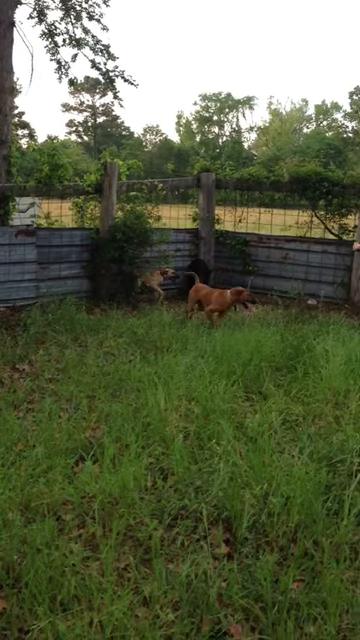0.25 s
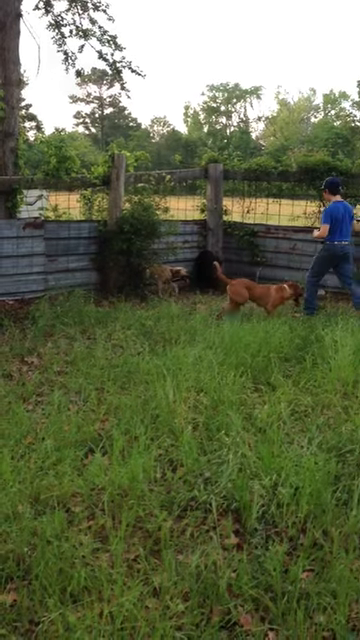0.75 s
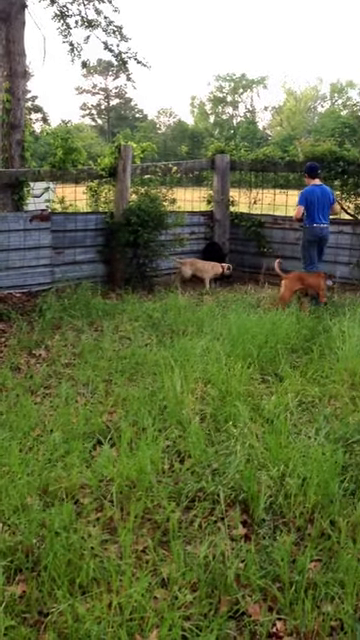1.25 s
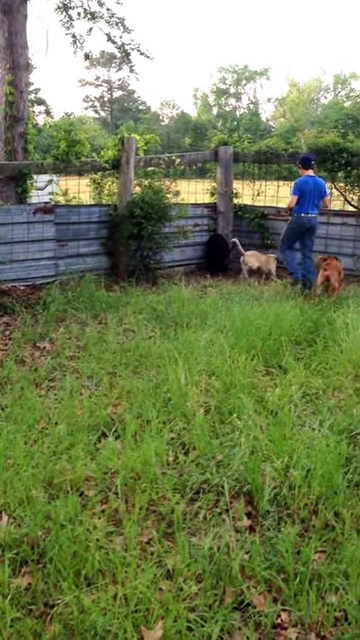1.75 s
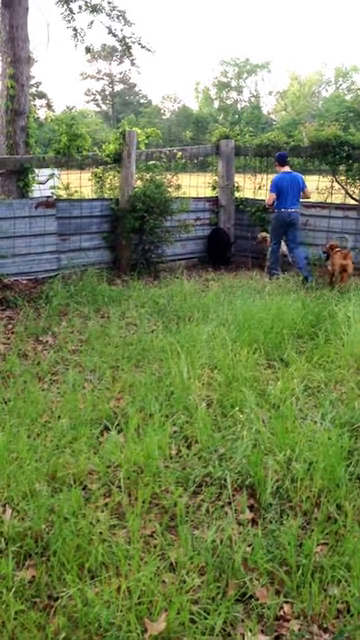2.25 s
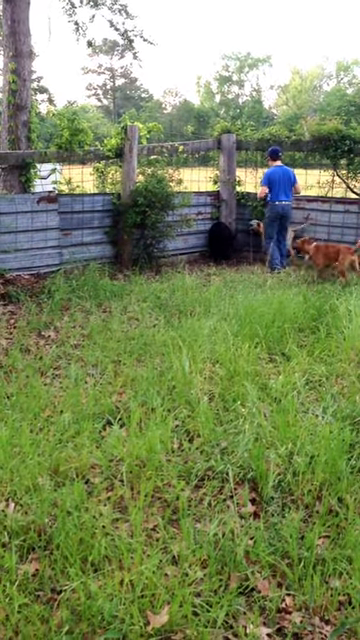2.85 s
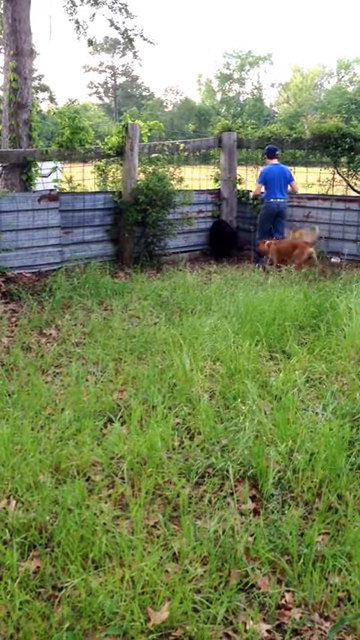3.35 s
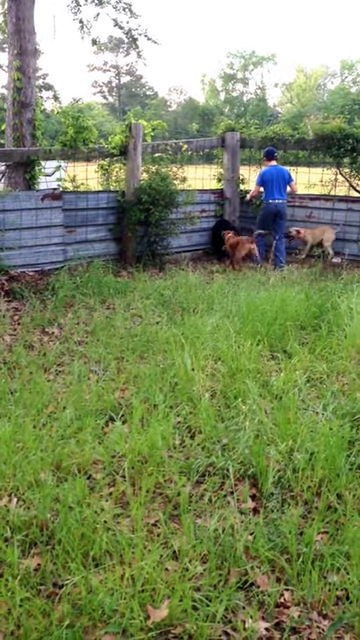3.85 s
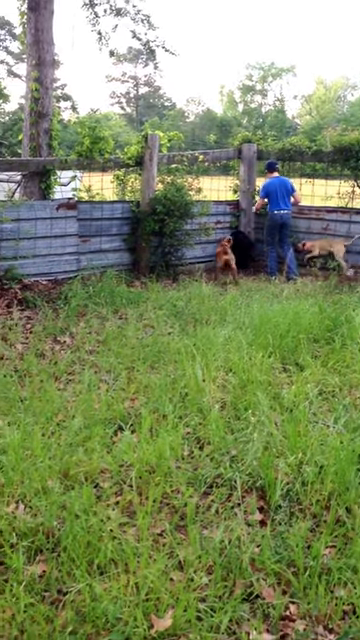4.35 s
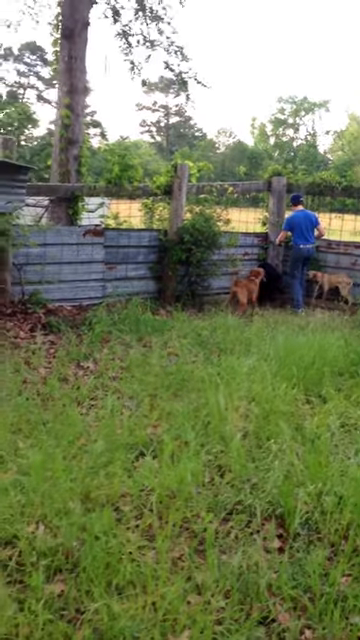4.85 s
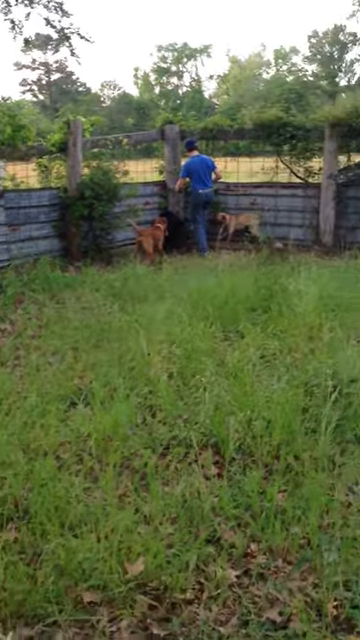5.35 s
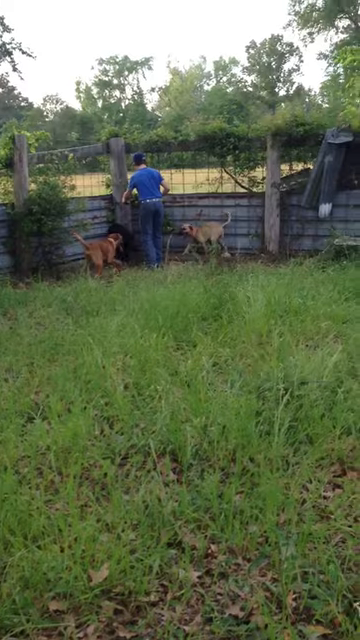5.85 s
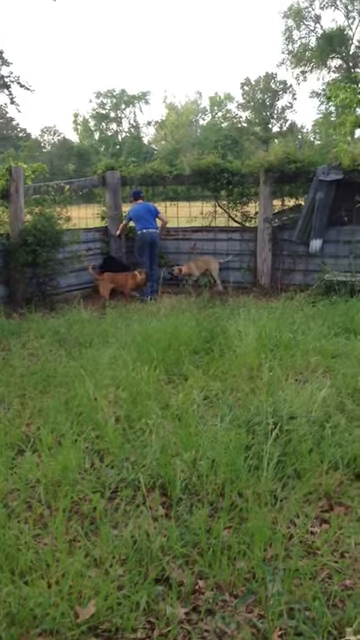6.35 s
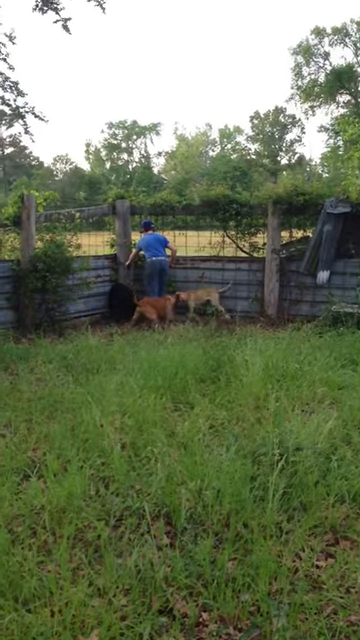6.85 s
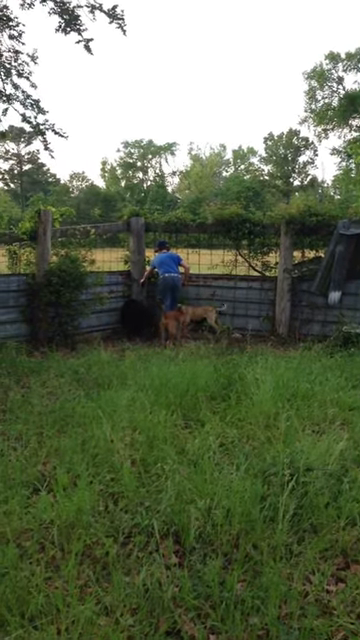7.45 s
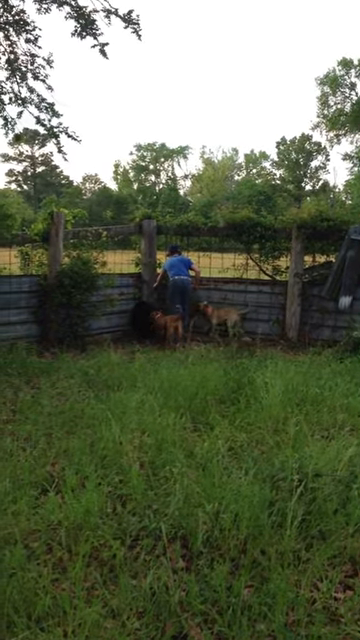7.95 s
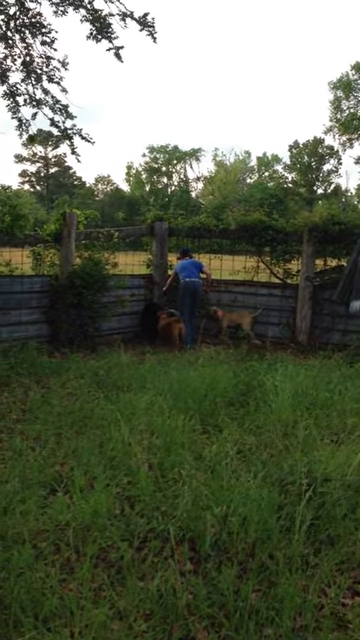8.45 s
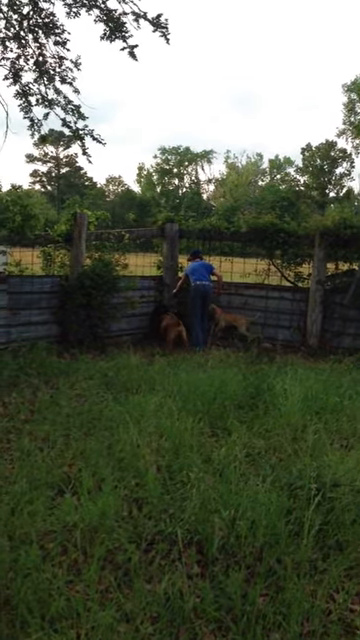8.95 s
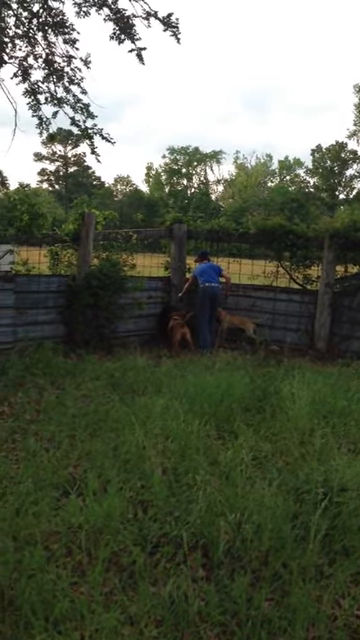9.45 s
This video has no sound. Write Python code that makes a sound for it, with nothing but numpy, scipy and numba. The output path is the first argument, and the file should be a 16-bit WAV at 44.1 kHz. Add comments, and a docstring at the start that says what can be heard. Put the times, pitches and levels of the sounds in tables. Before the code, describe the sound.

Several dogs bark about ten metres away in a grassy outdoor pen. One gives sharp yelps that break into harsh barks; a hound soon joins with repeated woofs, and a few low, gruff barks fall between. Twigs snap, leaves rustle and bodies bump dully, mostly in the first half. A metal fence adds a quick echo, with a few thin, high whistles and soft air behind.

```python
"""A clean yelp breaks into a roar: dogs are baying at an animal cornered against a sheet-metal fence,
some ten metres from the microphone across a grassy pen. A hound answers in arched woofs, with a few
gruff, low barks between. Each voice is vocal folds and breath, shaped by throat and mouth. The fence
slaps the barks back and far trees return a faint tail. Paws scuffle, twigs snap and thin whistles
come and go; behind it all lie faint yaps from further off, soft air and, later, a distant hum."""
import sys
import numpy as np
from scipy import signal
from scipy.fft import rfft, irfft
from scipy.io import wavfile
from scipy.ndimage import uniform_filter1d, minimum_filter1d
from numba import njit

SR = 44100
rng = np.random.default_rng(int(sys.argv[2]) if len(sys.argv) > 2 else 0)


def store_wav(level_fs):
    """Save 16-bit WAV to argv[1]."""
    pcm = np.round(np.clip(np.atleast_2d(level_fs), -1, 1) * 32767)
    wavfile.write(sys.argv[1], SR, pcm.T.astype(np.int16))


N = 427769

# the yelping dog's throat, heard across the pen: (frequency [Hz], gain [dB])
YELPER_THROAT = [(120, -43.5), (290, -27), (390, -8), (500, 2), (850, -5.5), (1200, 2.5), (1700, -4.5),
                 (2100, -5), (2520, -11.5), (3000, -25), (3400, -23.5), (3800, -26.5), (5400, -26),
                 (6900, -33), (8000, -39.5), (15000, -45.5)]
# clean yelps that open a bark:
# (start [s], length [s], pitch [Hz], glide [octaves], lift of both ends [octaves], level [dB],
#  mouth resonance [Hz])
YELPS = [(.611, 0.029, 1006, -0.071, 0.1, -7, 1390), (1.097, .031, 891, .14, 0.0049, -12, 1670),
         (1.124, 0.018, 1115, 0.22, 0.0064, -8, 840), (1.721, 0.026, 825, 0.036, 0.023, -13, 876),
         (2.567, 0.024, 866, 0.051, 0.024, -13.5, 2200), (2.593, 0.016, 1119, .2, 0.014, -10, 750),
         (4.577, 0.028, 1021, -0.061, 0.14, -3, 1680), (4.603, 0.038, 1410, 0.067, -0.052, -3, 950),
         (7.141, 0.023, 1087, -0.12, .16, 0.5, 1240), (7.176, 0.026, 1420, .06, -0.0096, -9, 940),
         (7.761, 0.027, 807, -0.19, 0.051, -9.5, 812), (8.223, 0.023, 855, 0.12, -0.0034, -6, 810),
         (8.258, .021, 832, -0.09, -0.042, -6, 800)]
# whines rising into a yelp: (start [s], length [s], first pitch [Hz], last pitch [Hz], last level [dB])
WHINES = [(1.028, .076, 397, 907, -16.5), (8.171, .056, 431, 814, -18)]


def yelps(attack_s=.007, release_db_per_s=1400.5, swell_db=3, whine_rise_db=22.5):
    """At the fence, tight folds sing an almost pure note, at times sliding up to it in a whine."""
    out = np.zeros(N)
    tight = dict(shut=0, throat=YELPER_THROAT, jitter=.12, rasp=.46, halves=.28,
                 mouth_db=11.5, mouth_width_hz=220, glance=.054, breathy_db=6.5)
    for start, length, hz, glide, lift, db, mouth_hz in YELPS:
        t, shape_db = envelope(length, attack_s, release_db_per_s)
        u = np.minimum(2 * t / length - 1, 1.2)
        pitch = hz * 2 ** (glide * u / 2 + lift * u ** 2)
        loud_db = db + shape_db + swell_db * u / 2
        add(out, start, bark(pitch, loud_db, rough=.036, mouth_hz=mouth_hz, **tight))
    for start, length, first_hz, last_hz, db in WHINES:
        t, shape_db = envelope(length, attack_s, release_db_per_s)
        pitch = slide(t, length, first_hz, last_hz)
        loud_db = db + shape_db - whine_rise_db * (1 - np.minimum(t / length, 1) ** 3)
        add(out, start, bark(pitch, loud_db, rough=.42, mouth_hz=900, **tight))
    return out


# roars that the yelps break into:
# (start [s], length [s], pitch [Hz], level [dB], roughness [0-1], first mouth resonance [Hz],
#  last mouth resonance [Hz], brightness [dB/octave])
ROARS = [(.644, 0.084, 546, -12, 0.55, 1020, 580, 0.48),
         (1.137, 0.085, 578.2, -10.5, 0.56, 870, 690, -0.052),
         (1.741, 0.094, 593.2, -11.5, 0.58, 810, 660, -0.3),
         (2.596, 0.092, 626.4, -9, 0.67, 755, 570, 0.26), (4.637, .062, 572.5, -12, .68, 892, 620, -.5),
         (7.202, .059, 575.5, -9, 0.38, 620, 760, 1.1), (7.788, 0.055, 543.6, -9, 0.6, 960, 580, 0),
         (8.258, 0.086, 517.7, -12, 0.67, 825, 780, 0.17)]
# last grunts as the jaw closes: (middle [s], pitch [Hz], level [dB])
GRUNTS = [(.765, 528, -16.5), (1.255, 533, -18), (2.716, 475, -18.5), (7.286, 568.6, -12.5),
          (7.871, 466, -11.5), (8.369, 454, -19.5)]


def roars(sag_octaves_per_s=2.6, drop_octaves_per_s=8, droop_db_per_s=41.5, grunt_half_s=.018):
    """The same voice breaks, drops about an octave and sinks as the jaw closes, often with a grunt."""
    out = np.zeros(N)
    broken = dict(jitter=.1, rasp=.5, halves=.29, mouth_db=14.5, mouth_width_hz=250,
                  glance=.1, breathy_db=5.5)
    for start, length, hz, db, rough, first_hz, last_hz, tilt_db in ROARS:
        t, shape_db = envelope(length, attack_s=.012, release_db_per_s=379.5)
        past_middle, past_end = t - length / 2, np.maximum(t - length, 0)
        pitch = hz * 2 ** (-sag_octaves_per_s * past_middle - drop_octaves_per_s * past_end)
        throb_db = 1.54 * wander(len(t), 99)  # the strained voice throbs unevenly
        loud_db = db + shape_db + throb_db - droop_db_per_s * past_middle
        roughness = rough + .25 * np.exp(-t / .022)  # roughest just after the break
        mouth_hz = slide(t, length, first_hz, last_hz)
        shut = np.interp(t, [length, t[-1]], [0, .45])
        throat = facing(YELPER_THROAT, tilt_db)
        add(out, start, bark(pitch, loud_db, roughness, mouth_hz, shut, throat, **broken))
    u = np.linspace(-1, 1, int(2 * grunt_half_s * SR))
    for middle, hz, db in GRUNTS:
        grunt = bark(hz * 2 ** (-.28 * u), db - 26 * u ** 2, rough=.56, mouth_hz=650, shut=.64,
                     throat=facing(YELPER_THROAT, tilt_db=-.6), **broken)
        add(out, middle - grunt_half_s, grunt)
    return out


# the hound's throat, heard across the pen: (frequency [Hz], gain [dB])
HOUND_THROAT = [(120, -30), (250, -7.5), (450, -8), (560, 3), (800, 2), (1350, 2.5), (1700, -1),
                (2350, -2.5), (2650, -13.5), (3000, -24), (4200, -32), (6500, -22), (9000, -36),
                (15000, -42.5)]
# the hound's answers:
# (start [s], length [s], top pitch [Hz], scoop time [s], level [dB], swell to the crest [dB],
#  roughness [0-1], first mouth resonance [Hz], last mouth resonance [Hz], brightness [dB/octave])
WOOFS = [(1.854, 0.11, 514.3, 0.054, -19, 2.3, 0.39, 800, 1210, 0),
         (2.214, 0.098, 453.8, 0.037, -15, 4.5, 0.15, 1350, 1264, 0.042),
         (3.003, 0.12, 481.3, 0.055, -17.5, 4.1, 0.26, 720, 1080, 0),
         (3.407, 0.12, 447.6, 0.053, -19.5, 7.2, 0.35, 1700, 906, 0),
         (4.212, 0.094, 484, 0.039, -14, 8.3, 0.13, 1050, 1380, .5),
         (4.592, .112, 469.7, 0.044, -23, 5.7, 0.32, 700, 900, -1),
         (4.969, 0.11, 456.5, 0.037, -22, 2.8, 0.44, 742, 1050, 0),
         (5.375, .115, 461.2, .036, -18.5, 8.8, 0.21, 900, 880, 1),
         (6.407, 0.11, 471, .026, -15, 3, 0.2, 903, 1455, -1),
         (7.006, 0.13, 466.2, 0.041, -21.5, 0.9, 0.33, 950, 1300, 0),
         (7.402, 0.12, 474, .042, -23.5, 5.4, 0.21, 1300, 1150, 0),
         (7.853, 0.086, 454.4, .03, -20, 3.1, 0.38, 560, 520, 0),
         (8.608, 0.11, 472, 0.037, -21, 2.8, 0.14, 950, 1260, 0),
         (9.033, 0.11, 451.8, .032, -19.5, 6.9, 0.27, 920, 900, 0),
         (9.447, 0.11, 448.6, 0.033, -17.5, 6.4, 0.31, 850, 1160, 0)]


def woofs(crest_share=.77, fade_db=8.5, drop_octaves_per_s=17, knee_s=.0072, catch_s=.046):
    """The hound's pitch arches with its effort; the voice is loudest and clearest at the crest."""
    out = np.zeros(N)
    hound = dict(jitter=.038, rasp=.59, halves=.25, mouth_db=5, mouth_width_hz=370,
                 glance=.49, breathy_db=7.5)
    for start, length, hz, scoop_s, db, swell_db, rough, first_hz, last_hz, tilt_db in WOOFS:
        t, shape_db = envelope(length, attack_s=.026, release_db_per_s=397.5)
        # the pitch scoops up, then drops as the breath ends
        scoop = .7 * np.exp(-(t / scoop_s) ** 2)
        drop = drop_octaves_per_s * knee_s * np.logaddexp(0, (t - length) / knee_s)
        pitch = hz * 2 ** -(scoop + np.minimum(drop, 1.25))
        past_crest = t / (crest_share * length) - 1
        slack = np.minimum(np.abs(past_crest), 1)
        arch_db = -np.where(past_crest < 0, swell_db, fade_db) * slack
        # an opening huff, then a brief dip
        catch_db = 3.5 * (np.exp(-t / catch_s) - np.exp(-((t - catch_s) / .031) ** 2))
        throb_db = 1.5 * wander(len(t), 58.7)
        loud_db = db + shape_db + arch_db + catch_db + throb_db
        roughness = rough + .067 * slack ** 2
        mouth_hz = slide(t, length, first_hz, last_hz)
        shut = np.interp(t, [length, t[-1]], [.3, 1.4])  # the muzzle is never wide open
        throat = facing(HOUND_THROAT, tilt_db)
        add(out, start, bark(pitch, loud_db, roughness, mouth_hz, shut, throat, **hound))
    return out


# the throat of the gruff voice: (frequency [Hz], gain [dB])
GRUFF_THROAT = [(120, -36.5), (270, -11), (400, 9), (800, 3.5), (1300, 1.5), (1900, 1.5), (2400, -16),
                (3000, -36.5), (6000, -25), (9000, -42), (15000, -45.5)]
# low barks between the woofs:
# (start [s], length [s], first pitch [Hz], last pitch [Hz], settling time [s], level [dB],
#  roughness [0-1], first mouth resonance [Hz], last mouth resonance [Hz])
GRUFF_BARKS = [(3.742, 0.12, 410.1, 279, .075, -17, .66, 1900, 834),
               (4.156, 0.096, 300, 269.7, 0.062, -17, .65, 704, 1130),
               (8.902, 0.098, 261, 411.6, .045, -17.5, .24, 1510, 1204)]


def gruff_barks():
    """Low, hoarse barks start ragged and settle onto their pitch, with a strong echo off the fence."""
    out = np.zeros(N)
    gruff = dict(throat=GRUFF_THROAT, jitter=.09, rasp=.29, halves=.77,
                 mouth_db=8.5, mouth_width_hz=270, glance=.98, breathy_db=9)
    for start, length, first_hz, last_hz, settle_s, db, rough, *mouth_ends_hz in GRUFF_BARKS:
        t, shape_db = envelope(length, attack_s=.045, release_db_per_s=380)
        unsettled = np.exp(-(t / settle_s) ** 2)
        pitch = last_hz + (first_hz - last_hz) * unsettled
        mouth_hz = slide(t, length, *mouth_ends_hz)
        shut = np.interp(t, [length, t[-1]], [0, .9])
        add(out, start, bark(pitch, db + shape_db, rough + .3 * unsettled, mouth_hz, shut, **gruff))
    return out


def bark(hz, db, rough, mouth_hz, shut, throat,
         jitter, rasp, halves, mouth_db, mouth_width_hz, glance, breathy_db):
    """Vocal folds, steady or chaotic as roughness grows, drive the throat and the mouth."""
    n = len(hz)
    rough = np.clip(rough, 0, .95)
    phase = phase_of(hz * (1 + jitter * (rough + .077) * wander(n, 420)))
    k = np.arange(1, int(9000 / np.median(hz)))[:, None]
    # overtones shimmer on their own and give way to air noise in the treble
    shimmer_db = 3.1 * np.array([wander(n, 40) for _ in k])
    overtones = undb(shimmer_db - np.interp(k * hz, [2300, 3000], [0, breathy_db]))
    overtones[1:] *= undb(np.interp(hz, [1080, 1350], [0, -12]))  # the highest yelps are nearly pure
    offsets = rng.uniform(0, 2 * np.pi, k.shape)  # reflections off the fence put overtones out of step
    folds = (overtones * np.cos(k * phase + offsets)).sum(axis=0) * np.sqrt(4 * hz / SR)
    # strained folds alternate strong and weak beats, adding lines between the overtones
    folds *= 1 + rough * (halves * np.cos(phase / 2) + .5 * wander(n, 300))
    # turbulent air leaves in one puff a cycle; the hiss stays even while the tone is clean
    puffs = rng.standard_normal(n) * (1 + .9 * np.cos(phase)) * undb(1.7 * wander(n, 110))
    puffs = colour(puffs, [(350, -1.5), (1000, .5), (2300, 6.5), (3200, 4), (6000, 2.5)])
    hiss = colour(rng.standard_normal(n), [(1800, -44), (3200, -11)])
    voice = colour((1 - rough) * folds + rasp * rough * puffs + hiss, throat)
    voice += undb(mouth_db) * resonance(voice, mouth_hz * np.ones(n), float(mouth_width_hz))
    # a shut muzzle leaves mostly the fundamental
    voice += undb(17.5) * shut ** 2 * resonance(voice, hz, 110.0)
    # a glancing echo off the fence, at a new distance for every bark
    lag = int(SR * rng.uniform(.002, .009))
    voice += glance * np.pad(voice, (lag, 0))[:n]
    voice /= np.sqrt(uniform_filter1d(voice ** 2, size=500) + 1e-12)  # so that db sets the level
    edges = np.interp(np.arange(n), [0, 60, n - 200, n], [0, 1, 1, 0])
    return voice * undb(db) * edges


def facing(throat, tilt_db):
    """A dog is brighter when it faces the microphone: tilt its throat colour by dB an octave."""
    return [(hz, db + tilt_db * np.log2(hz / 1000)) for hz, db in throat]


def pen(voices, fence_t60_s=.29, trees_t60_s=.62):
    """The direct sound, quick scattered slaps off the metal fence and a faint tail from far trees."""
    t = np.arange(int(1.5 * SR)) / SR
    slaps = rng.standard_normal(len(t)) * (rng.random(len(t)) < .05)
    fence = slaps * undb(-60 * t / fence_t60_s) * np.clip((t - .008) / .0055, 0, 1)
    fence = colour(fence / np.linalg.norm(fence),
                   [(200, 8.5), (600, -6), (1300, -4), (2500, -4.5), (6000, 10), (14000, -3.5)])
    trees = rng.standard_normal(len(t)) * undb(-60 * t / trees_t60_s) * np.clip(t / .015, 0, 1)
    trees = colour(trees / np.linalg.norm(trees), [(200, -10), (550, -6.5), (1000, 4), (1500, 6.5),
                                                   (2500, -3.5), (6000, -5), (14000, -15)])
    return voices + signal.fftconvolve(voices, undb(-14.5) * fence + undb(-30) * trees)[:N]


# dull bumps in the corner of the pen: (time [s], decay time [s], level [dB])
BUMPS = [(.555, 0.094, -52.5), (1.84, 0.055, -43.5), (2.35, .07, -50), (2.77, 0.1, -39.5),
         (3.16, 0.15, -55), (3.44, 0.11, -49), (3.78, 0.18, -51.5), (4.125, 0.081, -35.5), (4.35, .04, -54),
         (4.74, .1, -47.5), (5.14, 0.066, -49.5), (7.9, 0.13, -51.5), (8.36, 0.051, -53.5),
         (8.76, 0.022, -50)]


def bumps(rise_s=.018, shuffle_db=-73):
    """Bodies bump dully in the corner; restless paws go on in between."""
    t = np.arange(N) / SR
    thud = colour(rng.standard_normal(N), [(60, -40), (130, -13.5), (190, -3), (245, -4.5),
                                           (340, -16.5), (1200, -36), (4000, -56.5)])
    force = undb(shuffle_db) + sum(undb(db) * np.exp(-np.maximum((at - t) / rise_s, (t - at) / decay))
                                   for at, decay, db in BUMPS)
    return unit(thud) * force * undb(3 * wander(N, 35))


# leaves and grass underfoot: (middle [s], length [s], level [dB])
RUSTLES = [(0.029, 0.068, -64), (0.36, .07, -77), (2.546, 0.065, -44.5), (3.568, 0.097, -41),
           (4.154, 0.15, -43), (4.814, 0.11, -45), (5.737, 0.19, -51), (5.83, 0.1, -58),
           (6.242, 0.084, -54.5)]


def rustles():
    """Brushed leaves and grass give short swells of grainy noise."""
    out = np.zeros(N)
    for middle, length, db in RUSTLES:
        n = int(length * SR)
        grains = rng.standard_normal(n) * undb(1.9 * rng.exponential(size=n))
        leaves = colour(grains, [(300, -14), (1300, -1.5), (2300, -1), (3200, -5.5),
                                 (7000, -13.5), (15000, -25.5)])
        add(out, middle - length / 2, unit(leaves) * np.hanning(n) * undb(db))
    return out


# twigs breaking in the scuffle: (time [s], peak level [dB])
SNAPS = [(1.036, -49.5), (2.521, -31), (2.744, -37), (3.561, -42), (4.119, -34.5), (4.466, -33.5),
         (4.852, -31)]


def twig_snaps():
    """Each twig gives way in one bright crack that dies within hundredths of a second."""
    out = np.zeros(N)
    t = np.arange(2000) / SR
    decay = np.exp(-t / .0072) + .16 * np.exp(-t / .012)
    for start, db in SNAPS:
        burst = rng.standard_normal(len(t)) * decay
        crack = colour(burst, [(300, -6), (2000, 4.5), (6000, 3.5), (15000, -8)])
        add(out, start, crack / np.abs(crack).max() * undb(db))
    return out


# thin whistles high above the barking: (middle [s], length [s], pitch [Hz], level [dB])
WHISTLES = [(0.566, 0.04, 4760, -49), (2.183, 0.066, 10200, -64), (3.497, 0.061, 4930, -33),
            (4.556, 0.053, 4680, -44.5), (6.384, 0.12, 10280, -55.5), (7.084, 0.1, 4990, -33),
            (9.42, 0.061, 10450, -59.5)]


def whistles(bend_hz=420, waver_hz=70):
    """Short, unsteady whistles that dip in pitch and rise again."""
    out = np.zeros(N)
    for middle, length, hz, db in WHISTLES:
        u = np.linspace(-1, 1, int(length * SR))
        phase = phase_of(hz + bend_hz * u ** 2 + waver_hz * wander(len(u), 600))
        gain = (1 - u ** 2) ** 3 * undb(db + 6.1 * wander(len(u), 250))
        add(out, middle - length / 2, np.sin(phase) * gain)
    return out


# a dog further from the microphone: (time [s], level [dB])
FAR_YAPS = [(.005, -59), (0.1, -57), (.33, -56.5), (1.51, -57), (5.8, -56), (6.0, -57), (6.201, -51),
            (6.79, -59)]


def far_yaps(hz=900, waver=.02, length_s=.07):
    """Distance leaves only two blurred partials of each yap."""
    out, n = np.zeros(N), int(length_s * SR)
    for start, db in FAR_YAPS:
        phase = phase_of(hz * (1 + waver * wander(n, 500)))
        partials = np.sin(phase) + .5 * np.sin(2 * phase)
        add(out, start, partials * (1 + .5 * wander(n, 200)) * np.hanning(n) * undb(db))
    return out


# still outdoor air around the microphone: (frequency [Hz], gain [dB])
AIR = [(30, -32), (62, -14), (105, -3.5), (200, 1), (330, -5), (600, -4), (900, -5.5), (1400, -6.5),
       (2200, -7), (3200, -10), (7000, -15), (8700, -12.5), (10200, -18), (15500, -23)]


def air_and_hum(air_db=-58, hum_hz=106, hum_db=-70, hum_start_s=5.2):
    """Soft, slightly restless air; a distant hum comes in during the second half."""
    t = np.arange(N) / SR
    air = unit(colour(rng.standard_normal(N), AIR)) * undb(air_db + 2.6 * wander(N, 2.4))
    hum = np.sin(phase_of(hum_hz * (1 + .0044 * wander(N, 4.4))))
    return air + hum * undb(hum_db) * np.clip(t - hum_start_s, 0, 1)


def envelope(length, attack_s, release_db_per_s):
    """Times and dB of one call: it rises, holds until its length is up, then dies away."""
    t = np.arange(0, length + 42 / release_db_per_s, 1 / SR)
    return t, -28 * np.maximum(1 - t / attack_s, 0) - release_db_per_s * np.maximum(t - length, 0)


def slide(t, length, first_hz, last_hz):
    """An even glide that stays at its last frequency."""
    return first_hz * (last_hz / first_hz) ** np.minimum(t / length, 1)


def phase_of(hz):
    """Running phase of a moving pitch, in radians."""
    return 2 * np.pi * np.cumsum(hz) / SR


def wander(n, hz):
    """Random drift with hz turns a second and a spread near 1."""
    return np.interp(np.arange(n) * hz / SR, np.arange(4096), rng.standard_normal(4096))


def colour(x, points, size=2048):
    """Minimum-phase filter through (frequency [Hz], gain [dB]) points."""
    hz, db = np.transpose(points)
    bins_hz = np.maximum(np.arange(size // 2 + 1) * SR / size, 1)
    gain = undb(np.interp(np.log(bins_hz), np.log(hz), db))
    cepstrum = irfft(np.log(gain))
    cepstrum[1:size // 2] *= 2
    cepstrum[size // 2 + 1:] = 0
    return signal.fftconvolve(x, irfft(np.exp(rfft(cepstrum))))[:len(x)]


@njit
def resonance(x, hz, width_hz):
    """Band-pass with a moving centre, gain 1 there."""
    y, band_state, low_state = np.empty(len(x)), 0., 0.
    for i in range(len(x)):
        g, damping = np.tan(np.pi * hz[i] / SR), width_hz / hz[i]
        band = (band_state + g * (x[i] - low_state)) / (1 + g * (g + damping))
        band_state, low_state = 2 * band - band_state, low_state + 2 * g * band
        y[i] = damping * band
    return y


def undb(db):
    """Decibels to gain."""
    return 10 ** (np.asarray(db) / 20)


def unit(x):
    """Scale to rms 1."""
    return x / np.sqrt(np.mean(x ** 2))


def add(out, start, x):
    """Mix x into out from a start time in s."""
    i = max(int(start * SR), 0)
    out[i:i + len(x)] += x[:len(out) - i]


def scene():
    """Three voices and their scuffle, heard in mono from ten metres across the pen."""
    voices = yelps() + roars() + woofs() + gruff_barks() + far_yaps()
    return (pen(voices) + whistles() + bumps() + rustles() + twig_snaps() + air_and_hum())[None]


def record(dry, low_cut_hz=70, ceiling=.92, top_hz=15400):
    """The microphone sheds the deep bass, a quick limiter holds the loudest peaks; the top is cut."""
    thinned = signal.sosfilt(signal.butter(2, low_cut_hz, "high", fs=SR, output="sos"), dry)
    needed = ceiling / np.maximum(np.abs(thinned), ceiling)
    gain = uniform_filter1d(minimum_filter1d(needed, size=129), size=129)
    return signal.sosfilt(signal.ellip(8, .2, 70, top_hz, fs=SR, output="sos"), thinned * gain)


dry = scene()
out = record(dry)
store_wav(out)
```